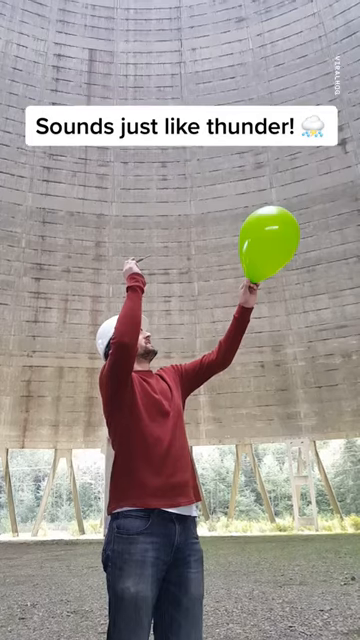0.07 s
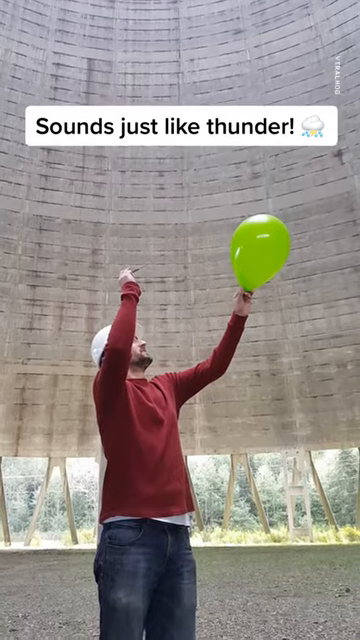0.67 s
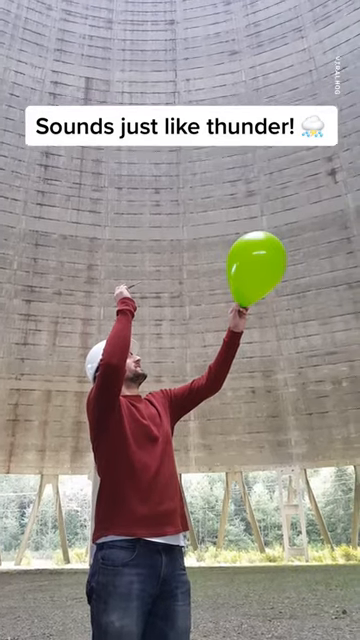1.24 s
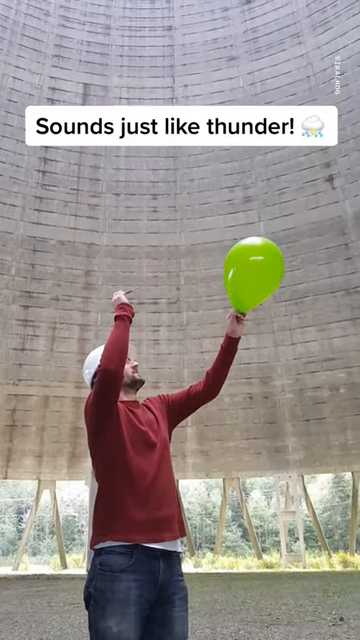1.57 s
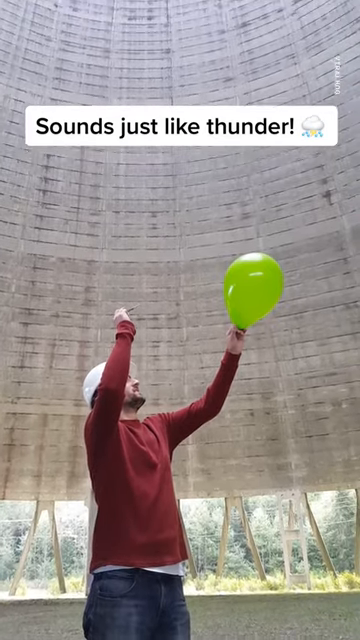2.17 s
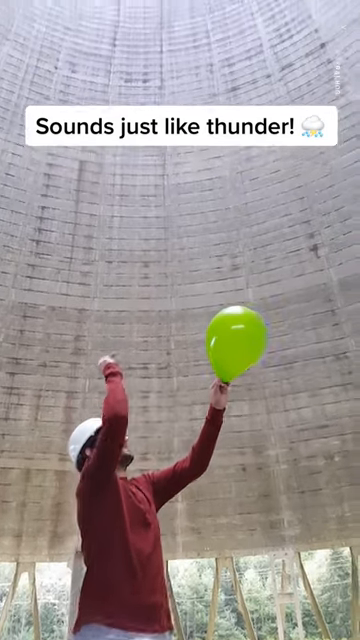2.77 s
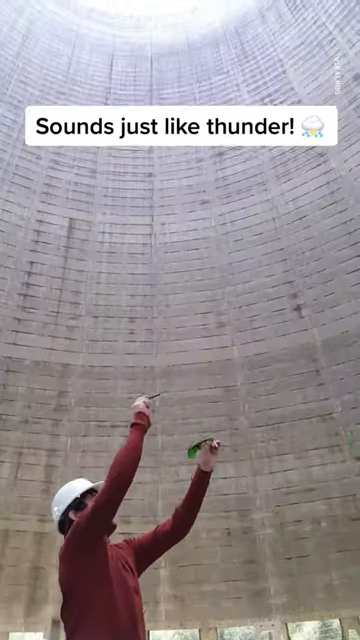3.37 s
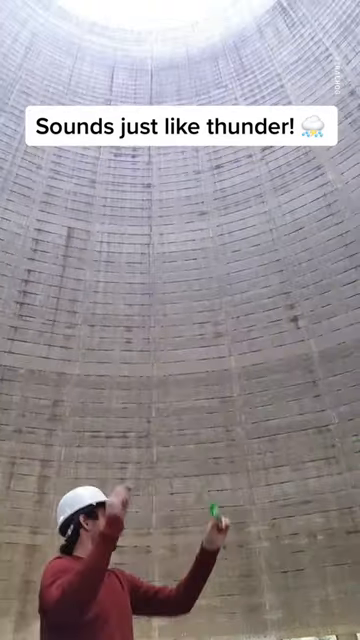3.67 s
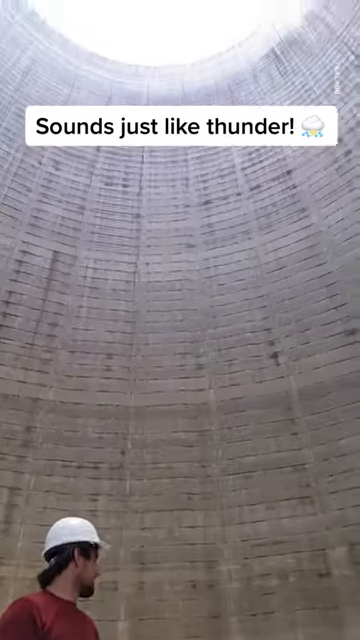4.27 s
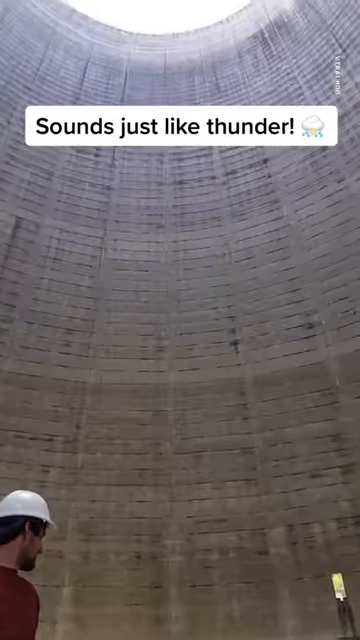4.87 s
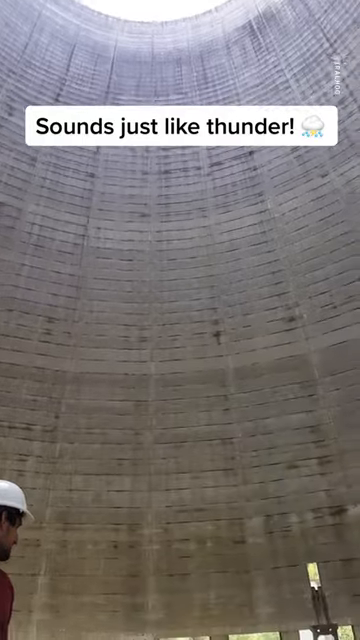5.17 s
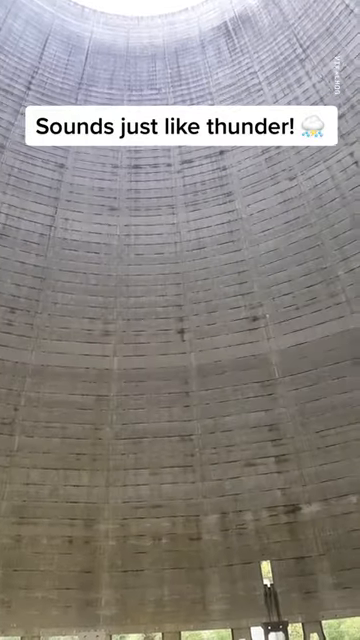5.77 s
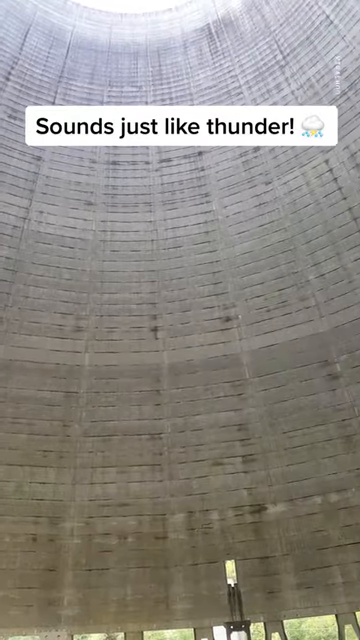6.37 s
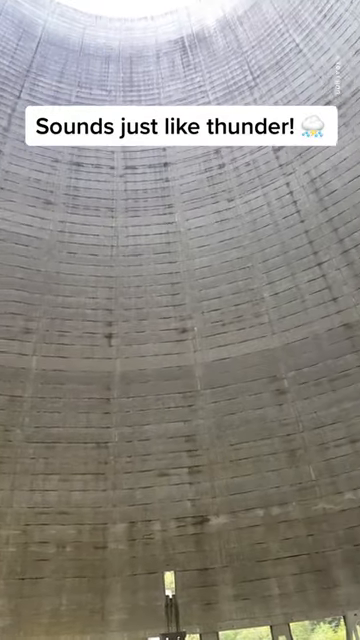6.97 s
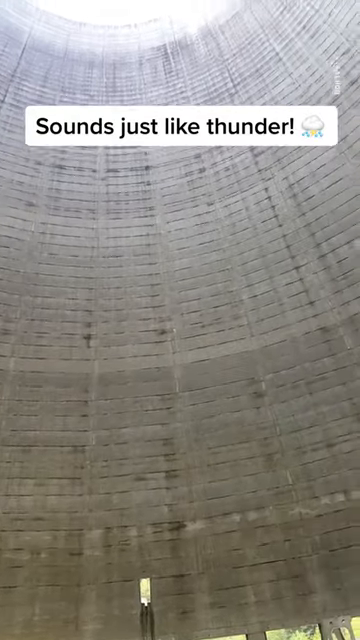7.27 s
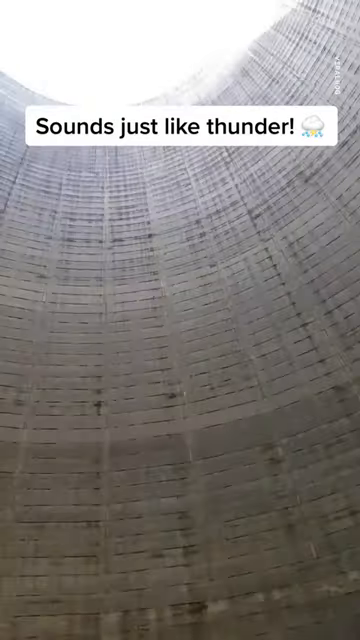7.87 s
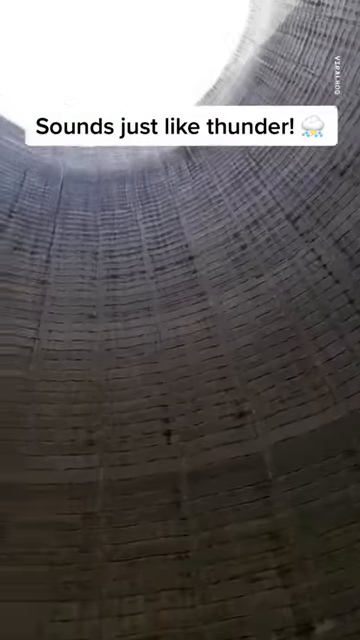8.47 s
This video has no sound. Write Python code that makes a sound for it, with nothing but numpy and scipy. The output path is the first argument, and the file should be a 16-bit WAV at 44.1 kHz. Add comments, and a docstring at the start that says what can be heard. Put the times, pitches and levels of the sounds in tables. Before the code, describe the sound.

For the first three seconds there is only quiet outdoor air inside a huge, empty concrete cooling tower, with a barely audible far-off drone. Low puffs of wind thump on the left side of the microphone around 0.6 to 1 second and again from 2.3 to 2.8 seconds, along with a few faint handling ticks. At about 3.1 seconds a balloon bursts close by: a sharp, loud crack with a very short ring, briefly overloading the microphone. Separate echoes snap back at once. From about 3.8 to 5.3 seconds, strong booming claps crowd together and swell into a wide roll like thunder. The roll then loses its treble and fades gradually, with weaker, duller claps scattered through it. A faint tick comes near 7.8 seconds, and the rumble is still dying away at the end, around 8.6 seconds.

```python
"""A balloon bursts inside a huge, empty concrete cooling tower, near enough to overload the microphone.
Its skin rips and rings; the curved wall throws the crack back in dozens of focused claps, which crowd
together, lose their treble in the air and roll away like thunder. Before the pop a few puffs of wind hit
the left side of the stereo microphone. Underneath are outdoor air, a far-off drone and handling ticks."""
import sys
import numpy as np
from scipy import signal
from scipy.fft import rfft, irfft, next_fast_len
from scipy.io import wavfile
from scipy.ndimage import uniform_filter1d

SR = 44100
rng = np.random.default_rng(int(sys.argv[2]) if len(sys.argv) > 2 else 0)


def inscribe(sig):
    """Save sig as 16-bit PCM at rate SR to the path in sys.argv[1].

    A 1-D sig is mono; a 2-D sig holds one channel per row.
    Samples are clipped to [-1, 1] before scaling.
    """
    pcm = np.round(np.clip(np.atleast_2d(sig).T, -1, 1) * 32767)
    wavfile.write(sys.argv[1], SR, pcm.astype(np.int16))


N = 379701
T = np.arange(N) / SR
POP_S = 3.1199

# stereo width of a diffuse field at the microphone: (frequency [Hz], side against mid [dB])
DIFFUSE_WIDTH = [(60, -3), (110, -5.5), (200, -16), (380, -11.5), (700, -7.5), (1290, 0), (2380, -3.5),
                 (4400, -1), (15000, 3)]
# spectrum of the outdoor air: (frequency [Hz], level [dB])
AMBIENCE_COLOUR = [(15, -35.5), (30, -15.5), (85, -2), (125, -11), (190, -8), (300, -19), (480, -24),
                   (800, -31.5), (2500, -37), (4500, -44.5), (8000, -47), (10500, -55), (13000, -48),
                   (15500, -51)]
# the background sinks for a while after the pop: (time [s], gain [dB])
AMBIENCE_SWELL = [(.19, -56), (.2, 0.5), (3.12, 1), (3.2, -10.5), (3.8, -8.5), (4.8, 5.5), (8.6, 4.5)]
# handling noises: (time [s], level [dB], centre [Hz], width [octaves], t60 [s], left against right [dB])
HANDLING_TICKS = [(2.411, -38.5, 580, 0.67, 0.014, -13), (2.461, -57, 2200, 0.68, 0.043, -7),
                  (2.47, -50.5, 1220, 0.9, 0.087, 5), (2.883, -42, 444, 0.59, 0.016, -12),
                  (3.031, -53.5, 450, 0.65, 0.027, -16), (7.789, -44, 2500, 0.75, 0.019, -9.5),
                  (8.195, -64, 13000, .2, .13, -4), (8.5, -70.5, 7350, .12, .15, 1)]
# spectrum of wind on the microphone: (frequency [Hz], level [dB])
WIND_COLOUR = [(20, -18), (55, -6), (90, 2.5), (170, -8), (300, -17.5), (600, -38.5), (2000, -65.5)]
# gusts on the left port: (time [s], length [s], level [dB])
WIND_GUSTS = [(0.199, .04, -53), (0.427, 0.16, -49.5), (0.609, 0.2, -37), (0.947, 0.088, -38.5),
              (2.303, 0.062, -41), (2.519, 0.054, -36), (2.625, 0.17, -34)]
# the strongest eddies, which thump: (time [s], level [dB])
WIND_EDDIES = [(.205, -31.5), (.635, -20.5), (.674, -15), (.711, -22), (.793, -18), (1.032, -27),
               (2.308, -30), (2.366, -27), (2.54, -19.5), (2.559, -16), (2.649, -15.5), (2.705, -13.5),
               (2.757, -18), (2.787, -10)]
# loud echoes off the wall: (time [s], length [s], boom level [dB], crack level [dB], focus [0-1])
WALL_ECHOES = [(3.202, 0.022, -34.5, -32.5, 0.53), (3.238, 0.0048, -24, -34.5, 0.63),
               (3.3255, 0.0031, -32.5, -37.5, 0.72), (3.41, 0.018, -54, -43, 0),
               (3.432, 0.048, -50, -53, 0.2), (3.461, 0.02, -38.5, -28, 0.05),
               (3.487, 0.013, -29, -29.5, 0.25), (3.506, 0.019, -35, -42.5, 0.04),
               (3.578, .011, -33, -44, 0.1), (3.606, .006, -42.5, -56, 0.5), (3.664, 0.012, -42, -40, 0.07),
               (3.694, 0.016, -43, -51, 0.1), (3.785, 0.024, -43, -45, 0), (3.802, 0.031, -20, -26.5, 0.32),
               (3.837, 0.028, -19, -26, 0.59), (3.894, 0.013, -32.5, -28, .2),
               (3.918, 0.025, -30, -33.5, 0), (3.961, 0.0086, -32.5, -59, 0.4),
               (3.998, .013, -37.5, -39.5, 0), (4.048, 0.0088, -34, -44, 0),
               (4.086, .022, -30.5, -29.5, .5), (4.11, 0.023, -22, -28.5, 0.26),
               (4.139, 0.051, -35.5, -33.5, 0.01), (4.183, 0.041, -28, -28.5, 0.02),
               (4.225, 0.015, -26, -33, 0), (4.269, .022, -31.5, -40.5, 0.02),
               (4.311, .012, -30.5, -41, 0.4), (4.3591, .021, -17.5, -26.5, 0.81),
               (4.393, .014, -31, -40, .5), (4.432, 0.076, -30, -36, 0), (4.501, 0.03, -17.5, -27, 0.38),
               (4.53, .032, -26, -29.5, 0.03), (4.567, 0.022, -16.5, -30, 0.05),
               (4.593, .05, -26.5, -31.5, 0.05), (4.655, .01, -35, -32.5, 0),
               (4.702, .018, -33.5, -40.5, .2), (4.785, 0.05, -28, -30, 0), (4.853, 0.091, -27, -35, 0.05),
               (4.956, 0.013, -24, -38, 0.17), (5.056, 0.023, -21.5, -32, 0.34),
               (5.095, 0.017, -20, -34, 0.8), (5.147, 0.05, -27.5, -37.5, 0.1),
               (5.203, 0.036, -23.5, -37.5, 0), (5.244, 0.05, -35.5, -45.5, 0.1),
               (5.292, 0.04, -24.5, -35, 0.13), (5.337, 0.029, -35, -36.5, 0.1),
               (5.488, .042, -38, -36, 0.5), (5.545, 0.012, -29.5, -42, 0.9), (5.592, 0.054, -36, -46, .1),
               (5.762, 0.056, -30, -42, 0.3), (6.032, 0.012, -30, -45.5, 0.54),
               (6.489, 0.021, -31.5, -53, 0.78), (6.602, 0.038, -40, -69, 0.84),
               (6.771, 0.032, -39, -64, 0.8), (6.991, 0.077, -42.5, -52.5, 0.07),
               (7.154, 0.054, -38.5, -59, 0.25), (7.296, 0.023, -38.5, -54, 0.8),
               (7.421, .035, -39, -55, 0.36)]
# spectrum of an echo's low part: (frequency [Hz], level [dB])
BOOM_COLOUR = [(25, -32.5), (60, -16.5), (120, -10), (170, -5.5), (240, -0.5), (330, -0.5), (430, -1),
               (650, -3.5), (850, -9.5), (1000, -15.5), (1300, -40), (3000, -87)]
# spectrum of an echo's high part: (frequency [Hz], level [dB])
CRACK_COLOUR = [(500, -48.5), (850, -8.5), (1050, -0.5), (1350, -1.5), (1750, -4), (2300, 3), (2900, 2.5),
                (3500, -1.5), (4100, -10), (5000, -6.5), (7500, -11.5), (9500, -27.5), (15000, -27)]
# absorption in the air: (frequency [Hz], relative loss [dB per s of travel])
AIR_LOSS = [(500, 0.5), (1200, -0.24), (2000, 0.63), (2900, 3), (4000, 7.5), (5500, 18), (8000, 27.5),
            (11000, 48.5), (16000, 55)]
# spectrum of the ripping skin: (frequency [Hz], level [dB])
RIP_COLOUR = [(20, -12), (160, -11.5), (280, 0), (640, -2), (1000, -7), (1500, 0), (2000, -6.5),
              (2900, 1.5), (3900, -7.5), (7500, -13.5), (15500, -24)]
# spectrum of the pop scattered close to the balloon: (frequency [Hz], level [dB])
SCATTER_COLOUR = [(20, -26.5), (115, -4.5), (170, -11), (270, -1), (430, -4), (680, -2), (850, -9),
                  (1080, -14), (1400, -6.5), (1900, -11.5), (2850, -8.5), (3900, -16.5), (7500, -24),
                  (15500, -35.5)]
# ringing of the bursting balloon: (frequency [Hz], level [dB], t60 [s])
BALLOON_MODES = [(257, -9.5, 0.12), (425, -19.5, .1), (560.6, -25, .11), (631, -20, 0.055), (950, -26, .06),
                 (1212, -25, 0.079), (1315, -24.5, .08), (1445, -23.5, 0.11), (1680, -25, .08),
                 (2343, -23, .1), (2749, -17, .11), (2902, -15, .12), (3638, -26, .08), (4506, -25, .08),
                 (4784, -19, .08)]


def amp(db):
    """Decibels to gain."""
    return 10 ** (np.asarray(db) / 20)


def unit_rms(x):
    """Scales to rms 1."""
    return x / np.sqrt(np.mean(x ** 2) + 1e-20)


def spectrum_at(points, hz):
    """Reads a spectrum on a log-frequency axis."""
    f, value = np.transpose(points)
    return np.interp(np.log(hz + 1), np.log(f + 1), value)


def add(mix, s, sound):
    """Mixes a sound in at time s."""
    part = mix[..., round(s * SR):][..., :sound.shape[-1]]
    part += sound[..., :part.shape[-1]]


def noise(colour, size=N, side_db=0):
    """Stereo noise of rms 1 with the given colour; side_db widens or narrows the diffuse field."""
    n = next_fast_len(size)
    hz = np.fft.rfftfreq(n, 1 / SR)
    mid, side = rfft(rng.standard_normal((2, n)))
    width = amp(spectrum_at(DIFFUSE_WIDTH, hz) + side_db)
    pair = np.array([mid + width * side, mid - width * side]) / np.sqrt(1 + width ** 2)
    return unit_rms(irfft(pair * amp(spectrum_at(colour, hz)), n)[:, :size])


def wavelet(t, hz):
    """One push of air between two shallow dips."""
    u = (np.pi * hz * t) ** 2
    return (1 - 2 * u) * np.exp(-u)


def low_cut(x, hz):
    """Takes away the deep bass."""
    return signal.sosfilt(signal.butter(2, hz, "high", fs=SR, output="sos"), x)


def ambience(air_db=-56.5, drone_hz=519, drone_db=-73.5, fall_db_per_s=3.5):
    """The bed of the place: outdoor air and a faint, far-off drone that fades."""
    drone_band = [(drone_hz - 25, -90), (drone_hz, 0), (drone_hz + 25, -90)]
    drone = amp(drone_db - fall_db_per_s * T) * noise(drone_band)
    air = amp(air_db) * noise(AMBIENCE_COLOUR, side_db=-1)
    return (air + drone) * amp(np.interp(T, *np.transpose(AMBIENCE_SWELL)))


def handling(rise_s=0.00057):
    """Ticks and scuffs of handling at the microphone: dry puffs of noise, each around one pitch."""
    out, t = np.zeros((2, N)), T[:SR // 5]
    f = np.fft.rfftfreq(len(t), 1 / SR)
    for s, db, hz, octaves, t60, pan_db in HANDLING_TICKS:
        colour = np.transpose([f, -4.3 * (np.log2((f + 1) / hz) / octaves) ** 2])
        envelope = amp(db - 60 * t / t60) * (1 - np.exp(-(t / rise_s) ** 2))
        pan = amp([[pan_db / 2], [-pan_db / 2]])
        add(out, s, noise(colour, len(t), side_db=-5.5) * envelope * pan)
    return out


def wind(breeze_db=-64, rise_s=0.014, fall_s=.025, whirl_db=-17, right_db=-23, lee_db=-67):
    """Until the pop a light breeze blows; gusts rumble and eddies thump on the microphone's left port."""
    blowing = (T > WIND_GUSTS[0][0]) & (T < POP_S)
    force = amp(breeze_db) * blowing
    for s, length, db in WIND_GUSTS:
        rise = np.clip((T - s) / rise_s, 0, 1)
        force += amp(db) * rise * np.exp(-np.maximum(T - s - length, 0) / fall_s)
    left = noise(WIND_COLOUR)[0] * force
    t = T[:SR // 20]
    middle = t[-1] / 2
    for s, db in WIND_EDDIES:
        hz = 122 * 2 ** (0.0438 * (db + 18))  # a stronger eddy passes faster
        lead_s = rng.uniform(0, 0.0034)  # a small whirl leads each eddy
        whirl = amp(whirl_db) * wavelet(t - middle + lead_s, 1.86 * hz)
        add(left, s - middle, -amp(db) * (wavelet(t - middle, hz) + whirl))
    lee = noise(WIND_COLOUR)[1] * amp(lee_db) * blowing  # the sheltered port has its own faint flutter
    return np.array([left, amp(right_db) * left + lee])


def grain(depth_db, size):
    """Uneven level as single reflections land, smoothed over size samples."""
    flicker = unit_rms(uniform_filter1d(rng.standard_normal(N), size))
    return unit_rms(amp(depth_db * flicker))


def skin_colour(x, ring_db=-2, width_hz=32):
    """The balloon's upper resonances colour every crack that comes back."""
    hz = np.fft.rfftfreq(4096, 1 / SR)[:, None]
    peaks_hz = np.array([f for f, db, t60 in BALLOON_MODES if f > 1000])
    resonances = 1 / (1 + (2 * (hz - peaks_hz) / width_hz) ** 2)
    impulse = np.fft.fftshift(irfft(1 + amp(ring_db) * resonances.sum(1)))
    return unit_rms(signal.oaconvolve(x, impulse[None], "same", axes=1))


def air_absorption(x, knots_db=1.5):
    """The farther a crack has travelled, the duller it is; only the colour changes, the power stays."""
    hz, t, spectra = signal.stft(x, SR, nperseg=256, noverlap=192)
    gain = amp(-spectrum_at(AIR_LOSS, hz)[:, None] * np.maximum(t - POP_S, 0))
    power = amp(spectrum_at(CRACK_COLOUR, hz))[:, None] ** 2
    gain /= np.sqrt((power * gain ** 2).sum(0) / power.sum())
    knots = uniform_filter1d(rng.standard_normal(gain.shape), size=9, axis=1)
    knots = unit_rms(uniform_filter1d(knots, size=3, axis=0))
    gain *= unit_rms(amp(knots_db * knots))  # crossing paths reinforce some pitches for a moment
    return signal.istft(spectra * gain, SR, nperseg=256, noverlap=192)[1][:, :N]


def roll_db(s, build_s=1.76, round_trip_s=.328, boom_fall_db_per_s=4.5, crack_fall_db_per_s=7.5):
    """Boom and crack levels of the diffuse roll at time s: it builds as paths multiply, then dies away."""
    age = np.maximum(s - POP_S, 0)
    built = 20 * np.log10(1e-6 + 1 - np.exp(-(age / build_s) ** 3.1))
    surge = 0.5 * np.cos(2 * np.pi * (s - 4.21) / round_trip_s)  # the sound crosses the tower and back
    swell = built + surge
    return -23.5 + swell - boom_fall_db_per_s * age, -24 + swell - crack_fall_db_per_s * age


def wake_power(fall_s=0.029, boom_db=-12.5, crack_db=-10.5):
    """The rough wall scatters the unfocused share of each loud echo into a short wake."""
    power = np.zeros((2, N))
    for s, length, boom, crack, focus in WALL_ECHOES:
        unfocused = np.full(int(length * SR), 1 - focus)
        add(power, s, amp([[boom + boom_db], [crack + crack_db]]) ** 2 * unfocused)
    pole = np.exp(-1 / (fall_s * SR))
    return signal.lfilter([1 - pole], [1, -pole], power)


def stray_echoes(from_s=4.3, per_s=8, against_roll_db=-5.5, spread_db=1.6, length_s=.014, focus=.5):
    """Weak echoes reach the microphone at loosely spaced random times; rows as in WALL_ECHOES."""
    rows = []
    for k, (slip, size, stretch) in enumerate(rng.standard_normal((128, 3))):
        s = from_s + (k + abs(slip)) / per_s
        boom, crack = np.array(roll_db(s)) + against_roll_db + spread_db * size
        rows.append((s, length_s * 2 ** (.5 * stretch), boom, crack, focus))
    return [row for row in rows if row[0] < T[-SR // 5]]


def wave_fronts(t, length, spacing, front_hz=340, jitter=0.057):
    """A focused echo: clean copies of the balloon's push, a few ms apart by way of wall and ground."""
    count = max(1, int(length / spacing + .5))
    slip, size, turn = rng.standard_normal((3, 64))
    arrivals = .002 + spacing * (np.arange(count) + jitter * slip[:count])
    fronts = (1 + 0.19 * size[:count]) @ wavelet(t - arrivals[:, None], front_hz)
    phase = 2.94 + .5 * turn[0]  # a focus turns the phase of a wave
    turned = (signal.hilbert(fronts) * np.exp(1j * phase)).real
    return turned * signal.windows.tukey(len(t), .02)


def tower(rise_s=0.00096, boom_fall_s=0.0075, crack_fall_s=.004, front_gap_s=.004, second_path=0.8):
    """The distant wall returns each echo as boom and crack, part focused, part scattered, over the roll."""
    boom_noise = noise(BOOM_COLOUR, side_db=-1)
    crack_noise = skin_colour(noise(CRACK_COLOUR) * grain(2.9, size=40))
    roll_boom, roll_crack = np.sqrt(amp(roll_db(T)) ** 2 + wake_power())
    booms = noise(BOOM_COLOUR, side_db=2) * roll_boom * grain(0.97, size=2400)
    cracks = skin_colour(noise(CRACK_COLOUR)) * roll_crack * grain(0.66, size=400)
    t = T[:SR // 6]
    for s, length, boom_db, crack_db, focus in WALL_ECHOES + stray_echoes():
        span = slice(round(s * SR), round(s * SR) + len(t))
        spacing = front_gap_s * np.exp(.12 * rng.standard_normal())
        rise = 1 - np.exp(-(t / rise_s) ** 2)
        after = np.maximum(t - length, 0)
        shape = rise * np.exp(.6 * (.5 - np.minimum(t / length, 1)))  # the shortest paths are strongest
        scattered = unit_rms(boom_noise[:, span] * shape * np.exp(-after / boom_fall_s))
        fronts = unit_rms(wave_fronts(t, length, spacing))
        body = np.sqrt(focus) * fronts + np.sqrt(1 - focus) * scattered
        add(booms, s, amp(boom_db) * np.sqrt(length / t[-1]) * unit_rms(body))
        pulsing = np.sqrt(1 - focus + focus * fronts ** 2 * length / t[-1])  # the crack rides the fronts
        envelope = pulsing * shape * np.exp(-after / crack_fall_s)
        clap = amp(crack_db) * crack_noise[:, span] * envelope / np.hypot(1, second_path)
        add(cracks, s, clap)
        add(cracks, s + spacing * rng.uniform(.15, 0.907), second_path * clap)  # colours each clap
    return low_cut(booms, hz=80) + air_absorption(cracks)


def skin_rip(t, level_db=-7, run_s=.0045, hold_s=0.0027, release_s=0.011):
    """The rip runs across the skin, growing louder, then stops."""
    times = np.cumsum([0, run_s, hold_s, release_s])
    shape_db = np.interp(t, times, [-8.5, 3.5, 3.5, -60], right=-120)
    return noise(RIP_COLOUR, len(t), side_db=-9.5) * amp(level_db + shape_db)


def near_scatter(t, rise_s=0.0098, hold_s=0.0085, t60_s=0.11, trail_t60_s=0.3):
    """A person and the gravel nearby scatter the pop: a quick swell, a steep fall, a fainter trail."""
    after = np.maximum(t - rise_s - hold_s, 0)
    fade = np.hypot(amp(-12 - 60 * after / t60_s), amp(-30.5 - 60 * after / trail_t60_s))
    return noise(SCATTER_COLOUR, len(t), side_db=1.5) * np.minimum(t / rise_s, 1) * fade


def skin_ring(t, rise_s=0.00084):
    """The bursting balloon rings in its modes, each slightly out of phase between left and right."""
    ring = np.zeros((2, len(t)))
    for hz, db, t60 in BALLOON_MODES:
        cycles = hz * t + rng.random() + 0.076 * rng.standard_normal((2, 1))
        ring += amp(db - 60 * t / t60) * np.sin(2 * np.pi * cycles)
    return ring * np.minimum(t / rise_s, 1)


def balloon_pop(push_db=4, push_hz=290, push_fall_s=.0012, ground_s=0.0032, ground_db=-4):
    """Close up: the skin rips and rings, the freed air swings out and back, the ground repeats the push."""
    t = T[:SR // 4]
    push = amp(push_db) * np.sin(2 * np.pi * push_hz * t) * np.exp(-t / push_fall_s)
    out = skin_rip(t) + near_scatter(t) + skin_ring(t) + push
    add(out, ground_s, amp(ground_db) * push)
    return low_cut(out, hz=45)


def scene():
    """What reaches the microphone: quiet air, wind, handling, the pop and the tower's answer."""
    mix = ambience() + wind() + handling() + tower()
    add(mix, POP_S, balloon_pop())
    return mix


def record(dry, ceiling=1.0, edge_hz=15750):
    """The microphone saturates on the pop; a steep low-pass then cuts the highest treble."""
    saturated = dry / (1 + (dry / ceiling) ** 4) ** (1 / 4)
    low_pass = signal.firwin(511, edge_hz, window=("kaiser", 9), fs=SR)
    return signal.oaconvolve(saturated, low_pass[None], "same")


dry = scene()
out = record(dry)
inscribe(out)
```